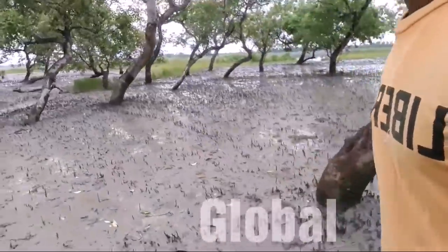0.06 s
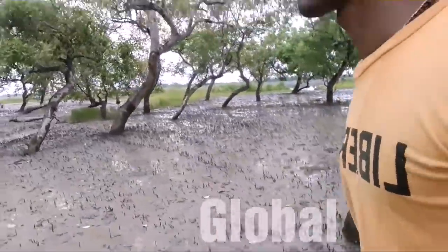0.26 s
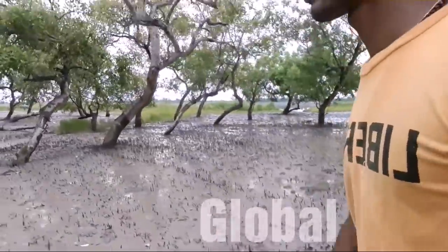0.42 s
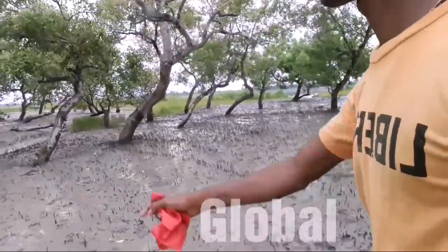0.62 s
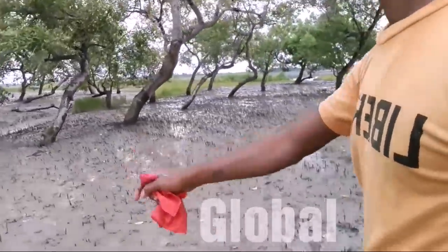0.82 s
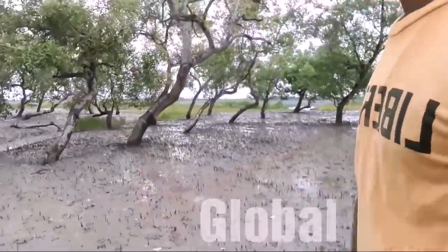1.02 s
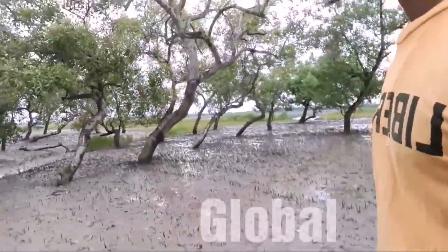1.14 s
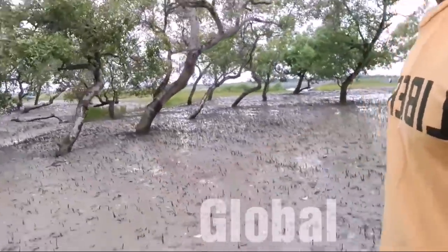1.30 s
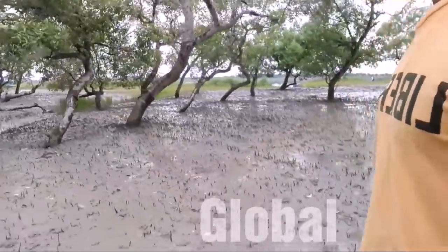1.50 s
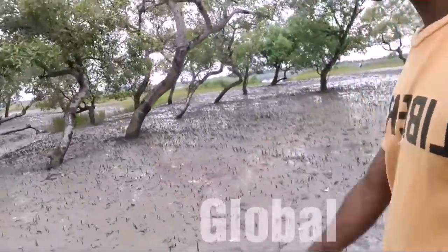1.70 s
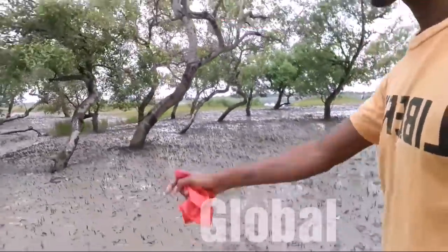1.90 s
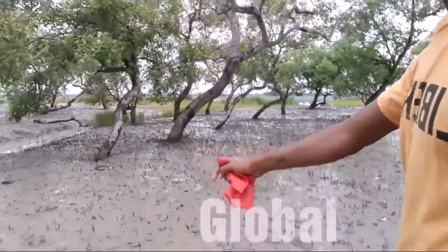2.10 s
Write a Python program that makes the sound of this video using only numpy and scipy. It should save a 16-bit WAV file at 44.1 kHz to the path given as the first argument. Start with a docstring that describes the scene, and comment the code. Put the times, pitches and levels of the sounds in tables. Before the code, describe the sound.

Close, crisp footsteps in sticky mud: irregular sharp clicks, fizzy crackle and small squelches, then a short woody creak, with a faint repeating bird, thin insect hiss and distant low rumble outdoors among trees.

```python
"""Feet in root-tangled mud

Feet press and pull through wet mud among thin roots, close by, in an open tidal wood. Snaps and spits are
sharp steps with short bursts of noise; mud is showers of tiny noise grains; a root creaks once as ringing modes.
A bird repeats a rasp and a rising whistle, both gliding sine tones prolonged by the trees.
Behind lie a far rumble of shaped noise and a thin insect hiss of pulsed narrow noise."""
import sys
import numpy as np
from scipy import signal
from scipy.fft import rfft, irfft, next_fast_len
from scipy.io import wavfile
from scipy.ndimage import uniform_filter1d

SR = 44100
rng = np.random.default_rng(int(sys.argv[2]) if len(sys.argv) > 2 else 0)


def log_audio(samples):
    """Write samples as a 16-bit WAV file to the path given in sys.argv[1]."""
    # one column per channel
    frames = np.atleast_2d(samples).T
    # limit to full scale, then quantise
    limited = np.clip(frames, -1, 1)
    pcm = np.round(limited * 32767).astype(np.int16)
    wavfile.write(sys.argv[1], SR, pcm)


def volts_from_decibels(level):
    """Turn decibel levels (scalar or array-like) into linear amplitude factors."""
    exponent = np.asarray(level, float) / 20
    return 10 ** exponent


N = 94815
T = np.arange(N) / SR

# Snaps of roots and crust. Each row: time in seconds, peak level in dB, centre in Hz,
# time to die by 60 dB in ms, width in octaves.
SNAPS = [(0.0647, -18.5, 3300, 14, 0.74), (0.0787, -29, 5450, 5.4, 1), (0.103, -31, 5000, 4, 1.4),
         (.1136, -26, 3630, 4, 1.06), (0.1244, -19, 6500, 5, 0.91), (0.133, -29, 5000, 4, 1),
         (0.14, -32, 4000, 3.5, 1.3), (0.171, -22, 6700, 5.3, 1.9), (0.2005, -33, 3630, 3.6, 0.98),
         (0.2098, -1.5, 5350, 8.6, 0.96), (.2423, -31.5, 4340, 5, 0.28), (0.2467, -28.5, 7600, 5.7, 0.33),
         (0.291, -31, 5070, 3.3, 0.57), (0.3166, -35, 4830, 5, 0.21), (.3273, -25.5, 5360, 6, 1.2),
         (.376, -34, 6250, 5, 0.46), (.395, -45, 7310, 6, 1.3), (0.478, -33, 4560, 4.8, 0.89),
         (.5385, -31.5, 4600, 4.6, 0.52), (0.546, -33.5, 2650, 5.1, 1.1), (.618, -47, 4830, 4.8, 1),
         (.6833, -39, 5490, 5, 0.74), (0.6964, -18.5, 4640, 5.3, 0.45), (0.7099, -22.5, 4860, 4.5, 1.2),
         (0.7195, -33, 2830, 5, 1.1), (.7236, -37, 3400, 5, 0.72), (.7252, -36, 3330, 5.5, 0.54),
         (0.7278, -33, 2900, 5, .9), (0.7314, -30, 2700, 6.4, 0.69), (0.7421, -29, 3180, 6, 0.71),
         (0.7443, -31, 3200, 5, 1.2), (0.7492, -11.5, 4060, 3, 1.16), (0.877, -25, 5000, 4, 0.79),
         (0.8875, -32.5, 4600, 6, 0.24), (0.9926, -46, 3500, 6, 1.7), (0.998, -38, 4500, 7.8, 0.65),
         (1.0781, -25, 2590, 14, 0.24), (1.093, -28.5, 3400, 8.9, 0.93), (1.156, -36.5, 3900, 4, 0.78),
         (1.1785, -16, 4530, 11, 0.89), (1.1868, -23.5, 3800, 2.9, 0.6), (1.243, -27, 5370, 4.9, 0.8),
         (1.2818, -36, 4870, 5.4, 0.36), (1.32, -41, 2100, 8, 1.05), (1.3877, -35, 4500, 6, 0.35),
         (1.406, -27, 4750, 4.8, 0.53), (1.413, -24.5, 5640, 4.6, 1.16), (1.683, -31, 4070, 8.7, 0.32),
         (1.7145, -30.5, 3570, 7, 0.37), (1.732, -36, 3020, 5, 1.3), (1.7531, -31.5, 3720, 4.4, 0.59),
         (1.762, -32.5, 4500, 8.7, 0.28), (1.8359, -30, 4000, 2.7, 0.26), (1.8858, -15, 5050, 17, 0.83),
         (1.907, -26, 6200, 4.5, 0.69), (1.952, -32.5, 5030, 3.8, 1.1), (1.82, -37, 1440, 4.7, 1.7),
         (1.8751, -43, 1170, 8, 0.65), (1.9778, -32.5, 4300, 5, 1.7), (2.077, -47, 4400, 7.4, 0.41),
         (2.106, -50, 4100, 6, .4), (2.136, -46.5, 3830, 6, 0.41)]
# Fine spits of water, treble only. Each row: time in seconds, peak level in dB, time to die by 60 dB in ms.
SPITS = [(0.065, -28, 4.9), (0.1017, -37, 6), (0.113, -24, 4.8), (0.1278, -17, 6), (0.1721, -14, 6),
         (0.235, -19, 6), (0.3303, -18, 6), (0.394, -14, 7.7), (0.4363, -30, 6.1), (0.7133, -19.5, 6.6),
         (0.7457, -25, 9.3), (0.7961, -36, 6.7), (0.8076, -22.5, 8.2), (0.8684, -32, 6.8), (1.1755, -28, 6),
         (1.1838, -24, 7), (1.2136, -38, 6), (1.233, -19.5, 14), (1.281, -30, 6.8), (1.3107, -31, 6),
         (1.3418, -26, 6), (1.389, -29, 6), (1.392, -27, 6), (1.4405, -21.5, 6.1), (1.579, -33, 6.6),
         (1.6777, -28, 6), (1.6928, -18, 6.6), (1.8003, -31, 7), (1.829, -29, 6), (1.8855, -18.5, 6.8),
         (1.953, -32, 6), (1.9775, -27, 6.5)]
SPIT_HZ, SPIT_OCTAVES = 13900, 1
ONSET_MS = 1  # sets how fast a break builds up
# The scatter from mud and trunks after every break: level against its peak, time to die by 60 dB.
TAIL_DB, TAIL_S = -24.5, 0.025

# Slow foot pressure. Each row: time in seconds, crackle of the mud in dB, spray of the water film in dB.
PRESSURE = [(0.0, -58, -63.5), (0.12, -49.5, -53.5), (0.25, -51, -62), (0.45, -52.5, -57.5),
            (0.54, -52.5, -59), (0.84, -55.5, -57), (0.99, -54, -57), (1.18, -56, -62.5),
            (1.31, -57.5, -66), (1.46, -55.5, -64), (1.67, -57, -56.5), (1.81, -51.5, -63),
            (1.86, -58, -60), (2.01, -57.5, -58.5), (2.15, -65.5, -69)]
# Sticky bursts as the foot tears free. Each row: start in seconds, length in seconds, crackle in dB, spray in dB.
TEARS = [(0.109, 0.088, -55, -55), (0.168, 0.02, -47.5, -58), (0.189, 0.1, -52.5, -52),
         (0.316, 0.042, -49, -46), (0.332, 0.1, -55.5, -59), (0.47, 0.015, -74, -52),
         (0.608, 0.022, -64, -56), (0.688, 0.045, -46, -52), (0.745, 0.014, -46, -54),
         (0.797, 0.017, -50, -57), (0.859, 0.044, -45.5, -49.5), (0.989, 0.016, -44, -74),
         (1.131, 0.031, -50.5, -69), (1.153, 0.056, -48.5, -74), (1.22, 0.028, -55, -44),
         (1.27, 0.055, -61, -61), (1.332, 0.022, -56, -52), (1.381, 0.06, -49.5, -46.5),
         (1.667, 0.056, -46, -52), (1.708, 0.075, -50.5, -55), (1.816, 0.038, -53.5, -53),
         (1.881, 0.079, -52.5, -51.5), (1.96, 0.062, -59, -57)]
# Bands of the mud crackle. Each row: centre in Hz, relative level in dB.
CRACKLE = [(900, -14.5), (1400, -19.5), (2000, -6), (2800, 3), (3800, 5), (5000, 6.5), (6400, 1.5),
           (7800, -7.5)]
# Bands of the water spray. Each row: centre in Hz, relative level in dB.
SPRAY = [(10200, -9.5), (11800, 4.5), (13400, 7), (15000, 5.5)]
GRAINS_PER_S, GRAIN_SPREAD_DB, LARGEST_GRAIN_DB = 1300, 6.5, 11  # the rate wanders around this middle value
SHARED, BED = 0.67, 0.31  # share of grains common to all bands, amount of steady noise
# Squelch, the suction of the mud in the middle range. Each row: time in seconds, level in dB.
SQUELCH = [(0.0, -59), (0.13, -85), (0.3, -67.5), (0.37, -56), (0.52, -70.5), (0.64, -59), (0.7, -60),
           (0.74, -51.5), (0.82, -88), (0.93, -58.5), (1.08, -71.5), (1.41, -88), (1.6, -59), (1.695, -48),
           (1.74, -56), (1.9, -65), (2.03, -77)]
SQUELCH_HZ, SQUELCH_OCTAVES = 1650, 0.88

# Stick-slip knocks of the creaking root. Each row: time in seconds, peak level in dB.
KNOCKS = [(1.5425, -33), (1.5629, -31), (1.5803, -29), (1.5998, -31.5)]
# The modes those knocks ring. Each row: pitch in Hz, relative level in dB, time to die by 60 dB in seconds.
ROOT = [(1630, 7, 0.0092), (1820, -3, 0.011), (2130, -8, 0.015), (1300, -26, 0.0051), (4500, 4.5, 0.0075)]

# Bird song, one phrase a row. Each row: rasp start in seconds, rasp level in dB,
# time the whistle reaches its top in seconds, whistle level in dB (levels before the fades and the trees).
PHRASES = [(-.05, -42, .011, -42), (.205, -42, .266, -39.5), (0.459, -44, .524, -41), (.76, -43, .824, -42),
           (1.049, -43, 1.109, -46), (1.32, -40.5, 1.39, -43), (1.6, -39, 1.672, -47.5)]
RASP_FROM_HZ, RASP_TO_HZ, RASP_S, RASP_ATTACK_S = 4850, 4250, .055, .003
RASP_TRILL_HZ, RASP_TRILL_DEPTH_HZ, RASP_ROUGH_HZ = 104, 380, 330
WHISTLE_FROM_HZ, WHISTLE_TO_HZ, WHISTLE_ROUGH_HZ = 2200, 2985, 45
RISE_S, HOLD_S, SWELL_DB = .022, .008, 17
ARCH_HZ = 40  # the whistle sags this far while held
TREES_T60_S, TREES_DB, TREES_GAP_S = .8, -4, .006

# How the rumble swells and ebbs. Each row: time in seconds, level in dB.
RUMBLE_SWELL = [(0.0, -50), (0.07, -49), (0.29, -46.5), (0.36, -50.5), (0.41, -47.5), (0.95, -52.5),
                (0.97, -48), (1.24, -51.5), (1.55, -47), (1.57, -48.5), (1.77, -44), (1.79, -49),
                (2.1, -47.5), (2.15, -48)]
# Spectrum of the rumble. Each row: frequency in Hz, relative level in dB per Hz.
RUMBLE = [(15, -17), (25, -24), (53, -13), (92, 0.5), (113, 2.5), (222, -6.5), (256, -5), (346, -15),
          (468, -18.5), (514, -19.5), (663, -25.5), (1100, -35), (1430, -87), (2420, -120)]
# Two insects, each on its own note. Each row: time in seconds, upper insect in dB, lower insect in dB.
INSECTS = [(0, -70, -85), (.5, -83, -88), (.85, -65.5, -80), (1.15, -67, -77), (1.35, -73, -68),
           (1.6, -73, -64), (1.85, -62, -65), (2.15, -69, -68)]
INSECT_WIDTH_HZ, INSECT_PULSES_HZ, INSECT_DEPTH = 95, 70, .55

# Spectrum of the smeared copy that differs between the channels. Each row: frequency in Hz, relative level in dB.
UNLIKE = [(60, -35), (110, -47), (200, -42), (380, -20), (700, -16), (1290, -3), (2380, -12), (4400, -12),
          (8120, -8), (15000, -7)]
SMEAR_DB = -10.5  # added to every level in UNLIKE
# Spectrum of the hiss that differs between the channels. Each row: frequency in Hz, relative level in dB per Hz.
HISS = [(24, -37), (40, -13.5), (513, -3.5), (785, -9.5), (959, -5.5), (1580, -16), (2030, -9), (4410, -7),
        (9110, -14), (13600, -3.5), (15800, -17)]
HISS_DB = -70  # before its level wanders

# Microphone: a dip in the treble, then a top edge.
DIP_HZ, DIP_WIDTH_HZ, DIP_DEPTH = 9250, 600, .8  # depth 1 would be a full notch
TOP_HZ = 15650


def breaks():
    """Snaps of roots and spits of water: each listed break is a short burst of noise in its own band."""
    out = np.zeros(N)
    lead = 2 * ONSET_MS / 1000  # the sharp step falls one ONSET_MS after the listed time
    for (s, db, hz, ms, octaves), noise in zip(SNAPS, rng.standard_normal((len(SNAPS), 2048))):
        add(out, s - lead, burst(noise, db, hz, ms, octaves))
    for (s, db, ms), noise in zip(SPITS, rng.standard_normal((len(SPITS), 2048))):
        add(out, s - lead, burst(noise, db, SPIT_HZ, ms, SPIT_OCTAVES))
    return out


def burst(noise, db, hz, decay_ms, octaves):
    """A break: noise builds up to a sharp step and dies in a band, with a faint scattered tail."""
    t = np.arange(len(noise)) / SR - 3 * ONSET_MS / 1000
    after = np.maximum(t, 0)
    build = np.where(t < 0, np.exp(np.minimum(t, 0) / (.5 * ONSET_MS / 1000)), 1)
    step = np.arange(len(t)) == np.argmax(t >= 0)
    # log(1000) makes a decay time mean a fall of 60 dB
    fade = np.exp(-np.log(1000) * after / (max(decay_ms, .3) / 1000))
    push = (0.33 * noise + 3.5 * step) * build * fade
    crack = band(push, hz, octaves, order=3)
    tail = band(noise[::-1], hz, octaves + 0.27, order=3)
    tail_fade = build * np.exp(-np.log(1000) * after / TAIL_S)
    tail = tail / tail.std() * volts_from_decibels(TAIL_DB) * tail_fade
    return volts_from_decibels(db) * (crack / np.abs(crack).max() + tail)


def mud():
    """Crackle and spray follow the foot's effort; the squelch of suction has its own rise and fall."""
    crackle = fizz(CRACKLE, 0.54) * effort(axis=1)
    spray = fizz(SPRAY, 0.31) * effort(axis=2)
    squelch = band(grains(700, 2.9) + 0.42 * rng.standard_normal(N), SQUELCH_HZ, SQUELCH_OCTAVES)
    squelch = level(squelch * volts_from_decibels(2.1 * walk(14.24)), 0) * curve(SQUELCH)
    return crackle + spray + squelch


def effort(axis):
    """Slow foot pressure plus a rounded swell as the sticky mud tears."""
    out = curve(PRESSURE, axis=axis)
    for row in TEARS:
        swell = np.sqrt(np.hanning(int(row[1] * SR)))
        add(out, row[0], volts_from_decibels(row[axis + 1]) * swell)
    return out


def fizz(bands, octaves):
    """Grains over a noise bed, partly shared by all bands, partly each band's own."""
    shared = grains(GRAINS_PER_S, GRAIN_SPREAD_DB)
    out = 0
    for hz, db in bands:
        own = grains(GRAINS_PER_S, GRAIN_SPREAD_DB)
        mix = SHARED * shared + (1 - SHARED) * own + BED * rng.standard_normal(N)
        flicker = 3.18 * walk(25.31)
        out = out + volts_from_decibels(db + flicker) * level(band(mix, hz, octaves), 0)
    return level(out, 0)


def grains(rate, spread_db):
    """Random tiny breaks, many small and a few large, each a brief fading puff of noise."""
    when = rng.random(N) < rate * volts_from_decibels(4.0 * walk(25)) / SR
    size = when * volts_from_decibels(np.minimum(spread_db * rng.exponential(size=N), LARGEST_GRAIN_DB))
    shape = signal.lfilter([1], [1, -np.exp(-1 / (0.00041 * SR))], size)
    return level(shape * rng.standard_normal(N), 0)


def creak():
    """The root sticks and slips, and each slip rings the same set of dying modes."""
    out, t = np.zeros(N), np.arange(1024) / SR
    ring = 0
    for hz, db, t60 in ROOT:
        ring = ring + volts_from_decibels(db) * np.sin(2 * np.pi * hz * t) * np.exp(-np.log(1000) * t / t60)
    ring = ring * (1 - np.exp(-t / 0.00049))  # soft start
    for s, db in KNOCKS:
        add(out, s + 0.00045, volts_from_decibels(db) * ring / np.abs(ring).max())
    return out


def bird():
    """Each phrase is a rasp and a whistle; fading noise echoes from the trunks prolong both."""
    pad = SR // 10  # room for a phrase that begins before time zero
    out = np.zeros(N)
    for rasp_s, rasp_db, top_s, whistle_db in PHRASES:
        add(out, rasp_s + pad / SR, volts_from_decibels(rasp_db) * rasp())
        add(out, top_s - RISE_S + pad / SR, volts_from_decibels(whistle_db) * whistle())
    t = np.arange(SR // 2) / SR
    trees = rng.standard_normal(len(t)) * np.exp(-np.log(1000) * t / TREES_T60_S) * (t > TREES_GAP_S)
    wet = signal.fftconvolve(out, level(trees, TREES_DB) / np.sqrt(len(t)))
    return (np.pad(out, (0, len(t) - 1)) + wet)[pad:pad + N]


def rasp():
    """A falling tone, made harsh by a fast trill and random wobble of its pitch."""
    t = np.arange(int(RASP_S * SR)) / SR
    hz = RASP_FROM_HZ + (RASP_TO_HZ - RASP_FROM_HZ) * t / RASP_S
    hz = hz + RASP_TRILL_DEPTH_HZ * np.sin(2 * np.pi * RASP_TRILL_HZ * t)
    wobble = uniform_filter1d(rng.standard_normal(4096), size=40)[:len(t)] * np.sqrt(40)
    hz = hz + RASP_ROUGH_HZ * wobble
    shape = np.minimum(t / RASP_ATTACK_S, 1) * (1 - t / RASP_S) ** 0.64
    return shape * np.sin(2 * np.pi * np.cumsum(hz) / SR)


def whistle():
    """A tone that swells as it rises, then sags a little while held."""
    t = np.arange(int((RISE_S + HOLD_S) * SR)) / SR
    up = np.minimum(t / RISE_S, 1)
    hz = WHISTLE_FROM_HZ + (WHISTLE_TO_HZ - WHISTLE_FROM_HZ) * np.sin(np.pi / 2 * up) ** 1.407
    hz = hz - ARCH_HZ * np.maximum(t - RISE_S, 0) / HOLD_S
    hz = hz + WHISTLE_ROUGH_HZ * uniform_filter1d(rng.standard_normal(len(t)), size=100) * 10
    ends = np.minimum(np.minimum(t, t[::-1]) / 0.0012, 1)  # short fades
    return volts_from_decibels(-SWELL_DB * (1 - up)) * ends * np.sin(2 * np.pi * np.cumsum(hz) / SR)


def rumble():
    """The far rumble: noise weighted to the bass, swelling and ebbing."""
    return level(colour(rng.standard_normal(N), RUMBLE), 0) * curve(RUMBLE_SWELL)


def insects():
    """Two insects on their own notes and chirp rates, each with its own loudness."""
    upper = insect(8530, 22) * curve(INSECTS, axis=1)
    lower = insect(8110, 16.5) * curve(INSECTS, axis=2)
    return upper + lower


def insect(hz, chirps_hz):
    """A narrow hiss around one note, pulsed fast and grouped in chirps."""
    smooth = signal.butter(2, INSECT_WIDTH_HZ, fs=SR, output="sos")
    rough = signal.sosfilt(smooth, 1 + rng.standard_normal(N) * 10)
    pulsed = rough * np.sin(2 * np.pi * hz * T) * beat(INSECT_PULSES_HZ) * beat(chirps_hz)
    return level(pulsed, 0)


def beat(rate):
    """A regular rise and fall in loudness whose pace wanders a little."""
    pace = rate * (1 + 0.101 * walk(8.1))
    return 1 + INSECT_DEPTH * np.sin(2 * np.pi * np.cumsum(pace) / SR)


def level(x, db):
    """Scale a sound to an rms (average power) level in dB."""
    return x * volts_from_decibels(db) / np.sqrt(np.mean(x ** 2))


def band(x, hz, octaves, order=2):
    """Keep only a band around hz, its width in octaves."""
    edges = np.clip(hz * 2 ** (np.array([-.5, .5]) * max(octaves, .03)), 20, .47 * SR)
    return signal.sosfilt(signal.butter(order, edges, "bandpass", fs=SR, output="sos"), x)


def curve(table, axis=1):
    """Turn one dB column of a time table into a smooth gain."""
    rows = np.array(table)
    return volts_from_decibels(np.interp(T, rows[:, 0], rows[:, axis]))


def colour(x, points):
    """Weight the spectrum of a sound by (Hz, dB) points joined on a log frequency axis."""
    size = next_fast_len(len(x))
    hz = np.arange(size // 2 + 1) * SR / size + 1  # the 1 avoids log of zero
    rows = np.array(points)
    gain = volts_from_decibels(np.interp(np.log(hz), np.log(rows[:, 0]), rows[:, 1]))
    return irfft(rfft(x, size) * gain, size)[:len(x)]


def walk(rate):
    """A wandering value: random levels, rate of them a second, smoothed twice and scaled to spread 1."""
    k = int(SR / rate)
    held = np.repeat(rng.standard_normal(N // k + 1), k)
    x = uniform_filter1d(uniform_filter1d(held, k), k)[:N]
    return x / x.std()


def add(out, s, sound):
    """Mix a short sound in at time s, cut to fit."""
    i = int(round(s * SR))
    part = sound[max(-i, 0):max(N - i, 0)]
    out[max(i, 0):max(i, 0) + len(part)] += part


def scene():
    """All sources reach both channels nearly alike; a faint hiss and a smeared copy differ between them."""
    close = breaks()  # not smeared
    wide = mud() + creak() + bird() + rumble() + insects()
    t = np.arange(4096) / SR
    blur = rng.standard_normal(len(t)) * np.exp(-t / 0.017) * (t > .002)
    smeared = signal.fftconvolve(wide, blur / np.sqrt(np.sum(blur ** 2)))[:N]
    hiss = level(colour(rng.standard_normal(N), HISS), HISS_DB) * volts_from_decibels(8.3 * walk(11.68))
    side = volts_from_decibels(SMEAR_DB) * colour(smeared, UNLIKE) + hiss
    return np.array([close + wide + side, close + wide - side])


def roll_off(x):
    """The treble ends steeply here."""
    return signal.sosfilt(signal.butter(12, 16990, fs=SR, output="sos"), x)


def record(dry):
    """The microphone dips near 9 kHz and the top is cut off steeply."""
    peak = signal.lfilter(*signal.iirpeak(DIP_HZ, DIP_HZ / DIP_WIDTH_HZ, fs=SR), dry)
    dipped = dry - DIP_DEPTH * peak
    top_cut = signal.ellip(6, .3, 40, TOP_HZ, fs=SR, output="sos")
    mix = signal.sosfilt(top_cut, dipped)
    return roll_off(mix)


dry = scene()
out = record(dry)
log_audio(out)
```